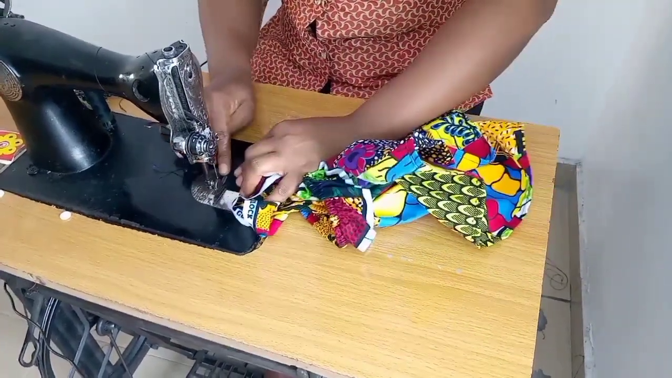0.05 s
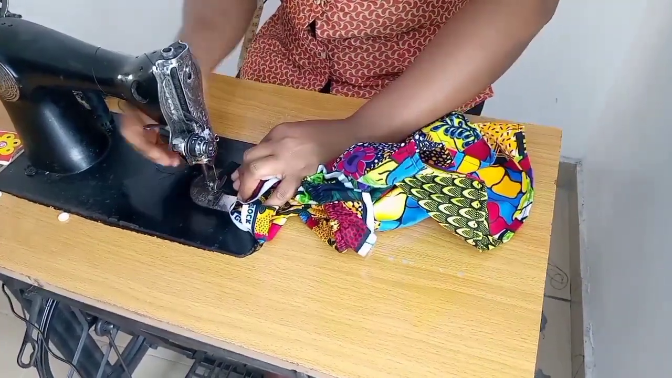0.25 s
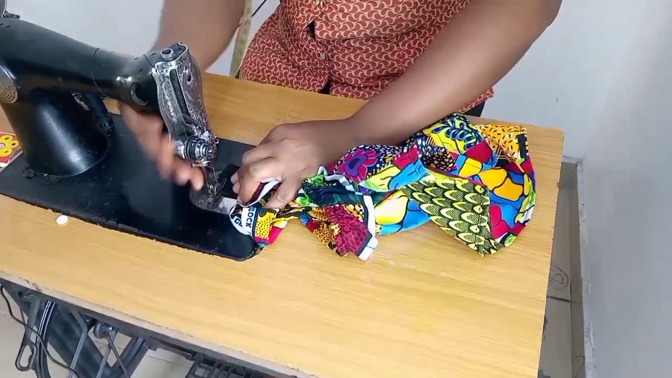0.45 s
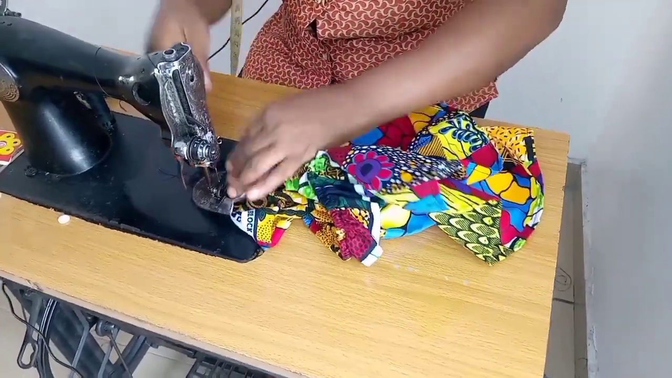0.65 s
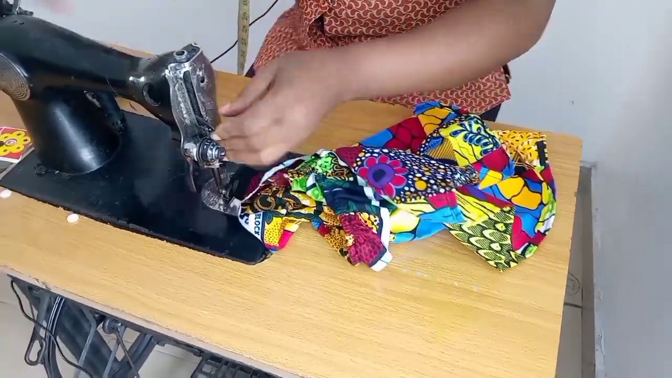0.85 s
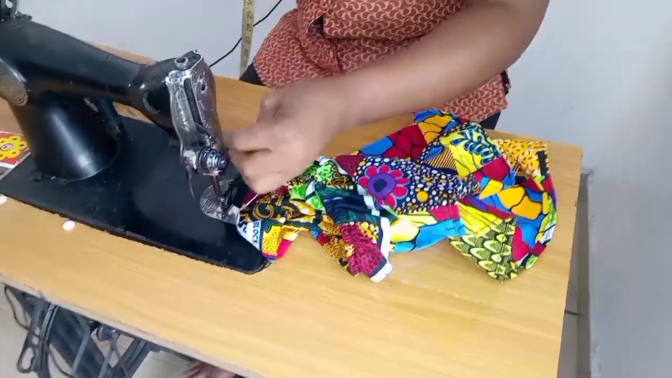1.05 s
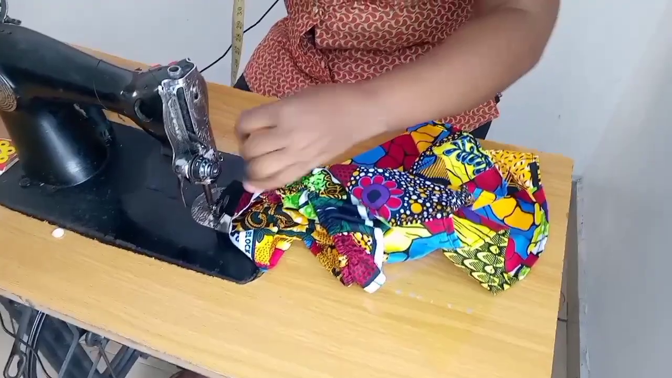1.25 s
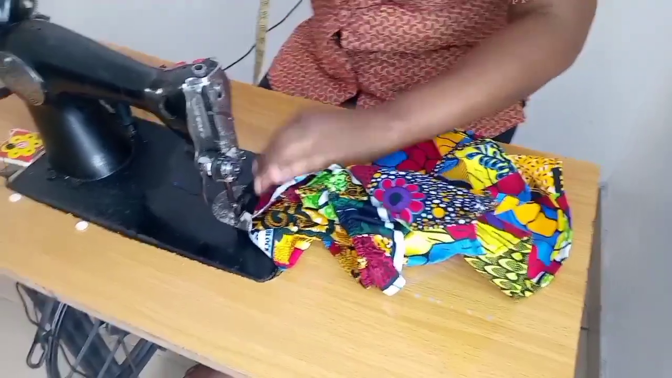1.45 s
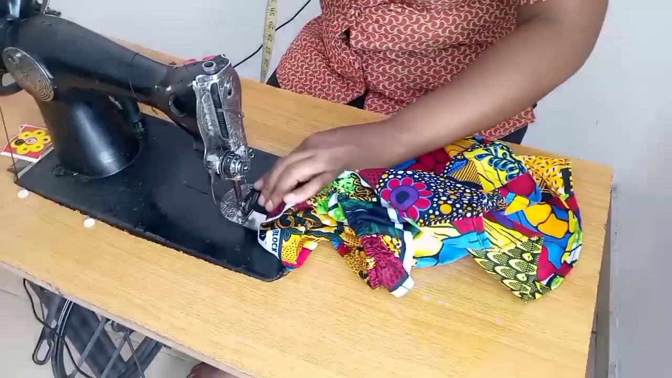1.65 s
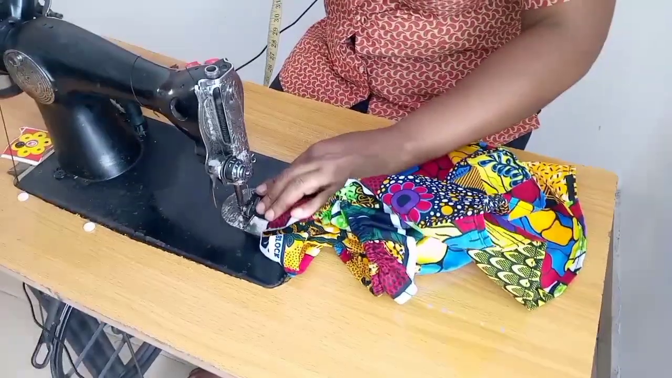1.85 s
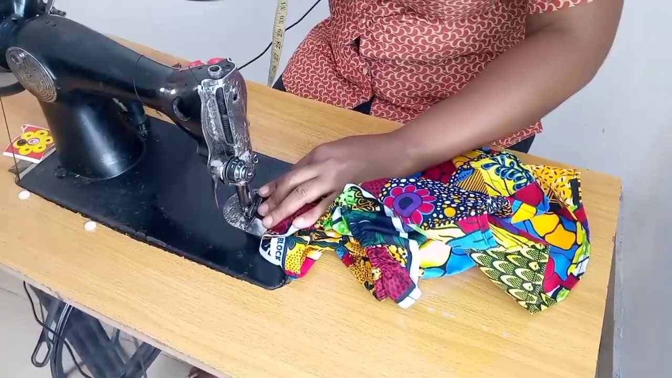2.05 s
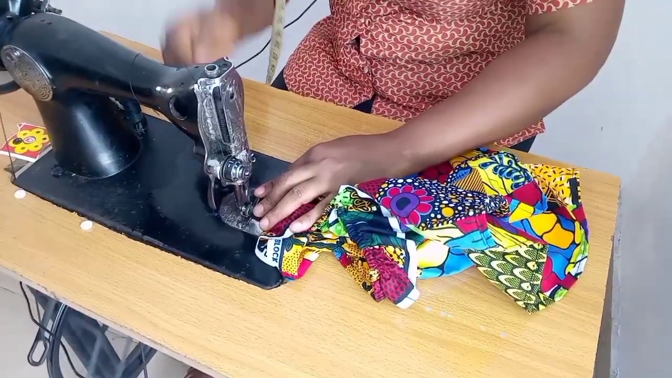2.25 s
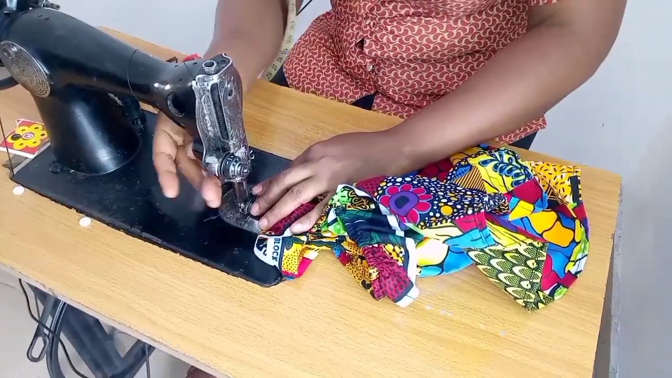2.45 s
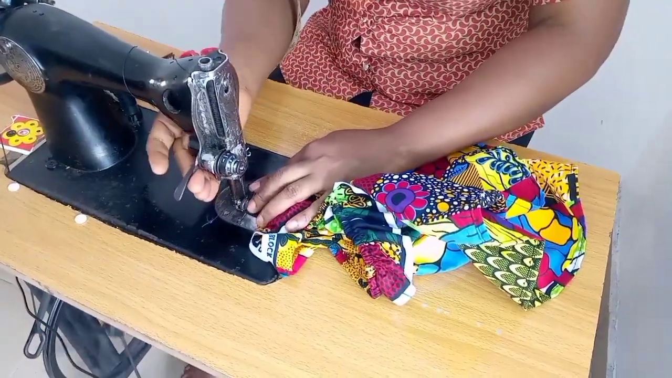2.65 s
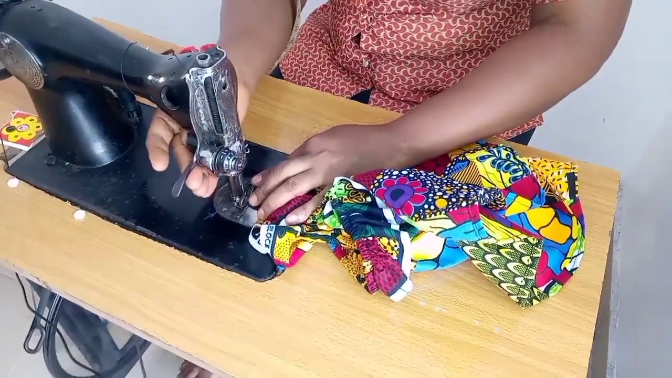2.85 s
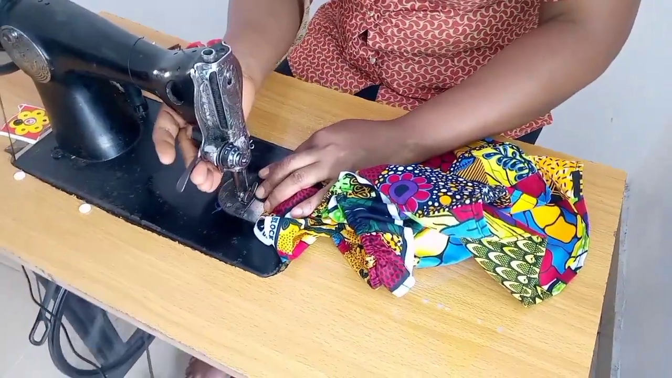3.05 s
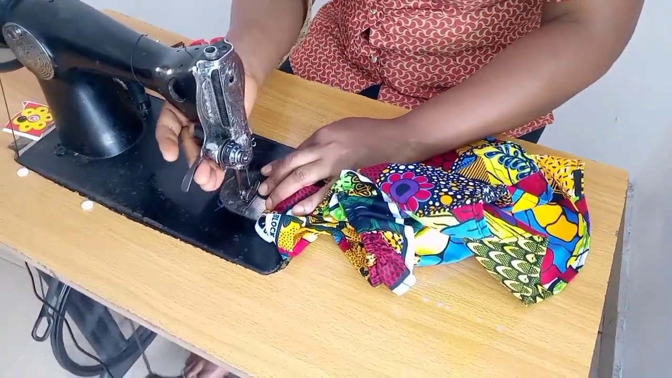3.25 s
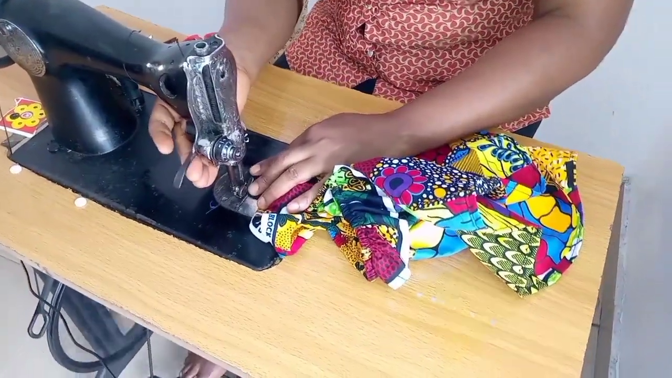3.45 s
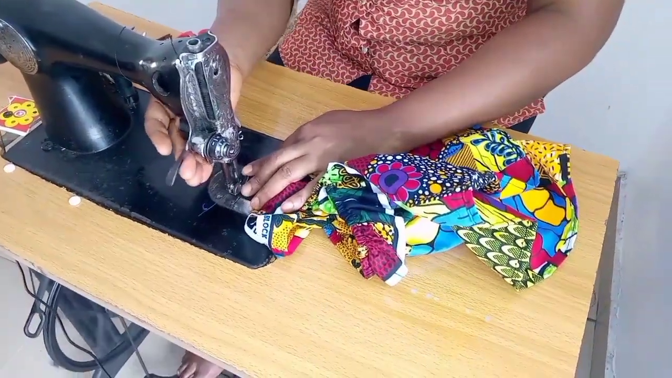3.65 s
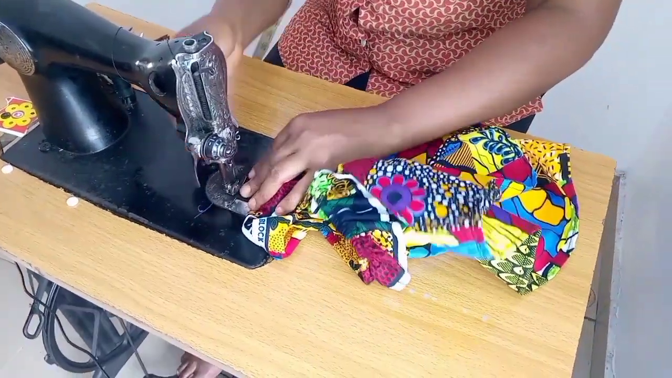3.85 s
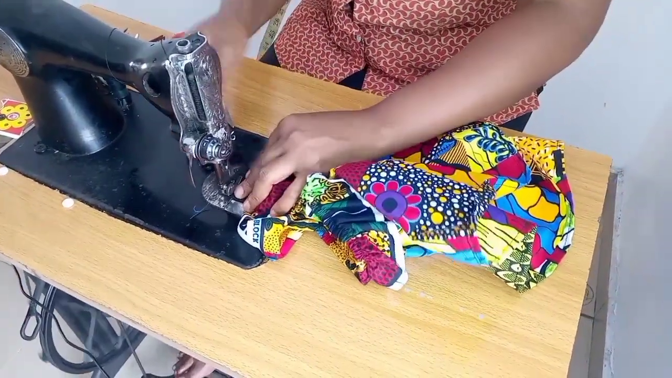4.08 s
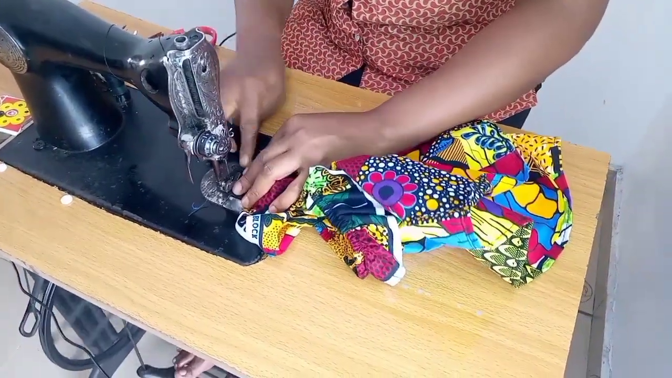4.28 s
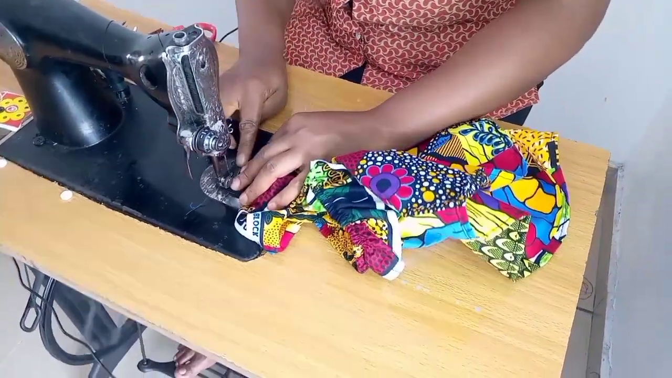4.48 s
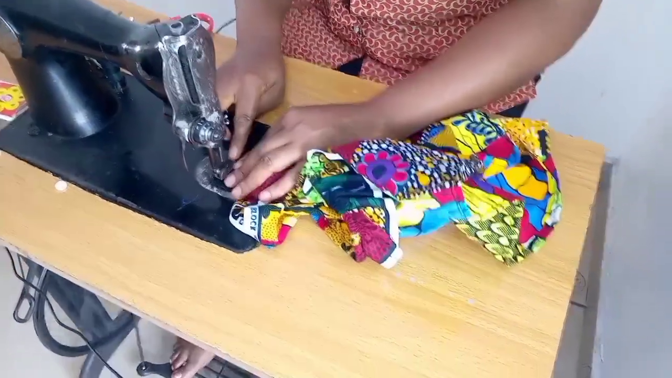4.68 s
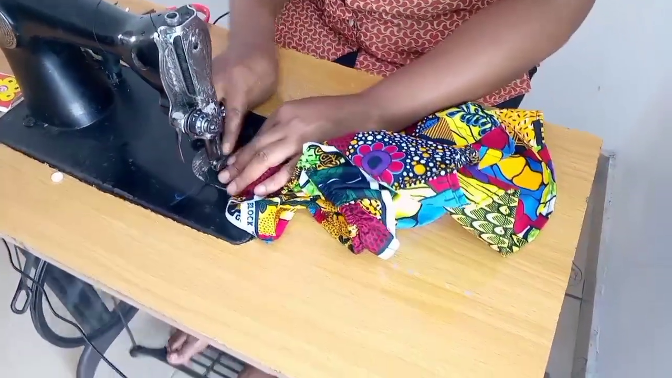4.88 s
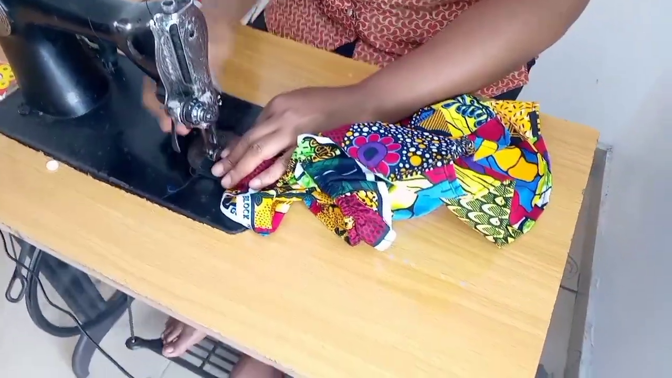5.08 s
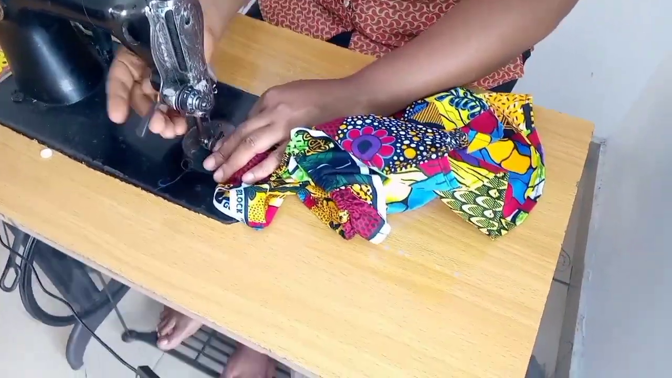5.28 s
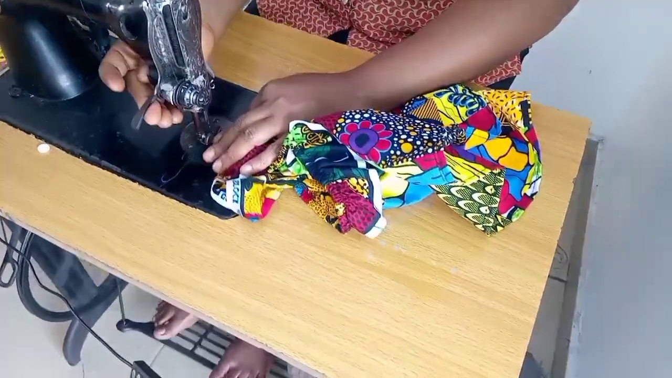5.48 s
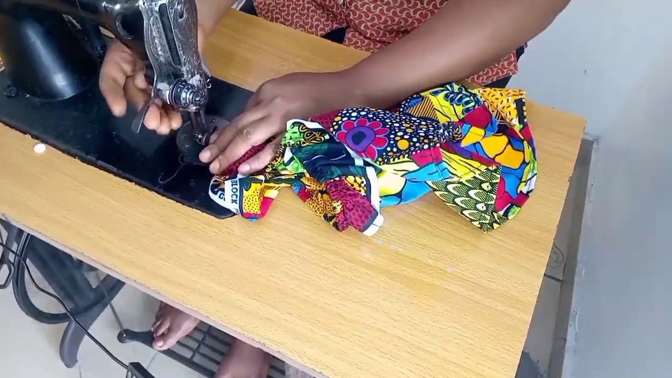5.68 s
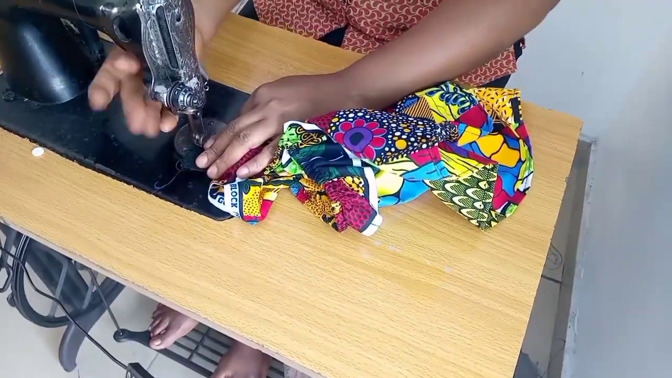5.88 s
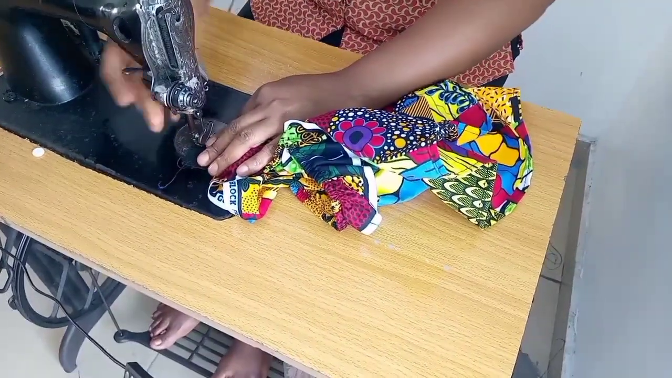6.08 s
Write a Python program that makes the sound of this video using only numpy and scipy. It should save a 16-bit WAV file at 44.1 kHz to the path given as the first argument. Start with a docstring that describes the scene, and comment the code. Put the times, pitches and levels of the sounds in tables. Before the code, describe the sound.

After some faint handling of fabric, a foot-powered sewing machine clatters in two quick bursts with a brief pause between.

```python
"""A treadle sewing machine on a wooden table in a hard, quiet room. Over a far rumble and a low hum,
hands drop the presser foot, rustle the cloth and push the wheel. From 2.5 s comes a short run: each stitch
is one sharp steel click, two lighter ones and three knocks into the iron bed, over a rattle of loose links.
The gear eases off near 4 s, stray clicks and knocks lead into a second run at 4.7 s,
and the machine winds down near 6 s."""
import sys
import numpy as np
from scipy import signal
from scipy.fft import rfft, irfft
from scipy.io import wavfile
from scipy.ndimage import uniform_filter1d

SR = 44100
rng = np.random.default_rng(int(sys.argv[2]) if len(sys.argv) > 2 else 0)


def inscribe(sig):
    """Save sig as 16-bit PCM at rate SR to the path in sys.argv[1].

    A 1-D sig is mono; a 2-D sig holds one channel per row.
    Samples are clipped to [-1, 1] before scaling.
    """
    pcm = np.round(np.clip(np.atleast_2d(sig).T, -1, 1) * 32767)
    wavfile.write(sys.argv[1], SR, pcm.astype(np.int16))


N = 269980

# Levels are relative, ahead of each layer's trim; a blow's chatter is capped at 14 ms.
# fader ride of the far rumble: (time [s], level [dB])
RUMBLE_RIDE = [(0.0, -50), (1.2, -54), (1.55, -54), (1.67, -58.5), (2.05, -56), (2.2, -52), (3.9, -57.5),
               (4.2, -61), (4.5, -54.5), (5.9, -56), (6.12, -60)]
# its tone: (frequency [Hz], density [dB])
RUMBLE_TONE = [(15, -56), (25, -29), (71, -2.5), (103, -7.5), (144, 0), (357, -11), (391, -11), (427, -14),
               (812, -10), (1320, -13), (1410, -10), (2750, -27.5), (5000, -48), (6500, -64), (11000, -120)]
# lowest modes of room, stand, table top and bed plate:
# (pitch [Hz], level against the rumble ride [dB], level at full run [dB])
HUM_MODES = [(75, -10, -66), (118.4, -12.5, -57), (177.4, -8.5, -49.5), (380, -15.5, -54.5)]
# swells of the hum: (peak time [s], pitch [Hz], level [dB], length [s])
HUM_SWELLS = [(.27, 177, -48, 0.11), (0.408, 75.4, -53, .12), (.54, 178, -45, .06), (.54, 120, -47, .06),
              (.59, 76, -54, .1), (0.888, 75.4, -57, 0.14), (2.01, 183, -51, .08),
              (2.223, 386, -43.5, 0.13), (2.293, 119, -47.5, 0.15), (2.56, 183, -45, 0.074),
              (2.66, 390, -43, 0.056), (2.901, 392, -38, 0.046), (3.0, 119, -45, 0.09),
              (3.08, 383, -45, .07), (3.12, 178.4, -40.5, 0.19), (3.19, 388, -36, 0.033),
              (3.37, 377, -34.5, 0.034), (3.288, 385, -49, 0.071), (3.36, 175, -43.5, 0.12),
              (3.441, 121, -44, 0.075), (3.57, 179, -42, 0.11), (3.68, 176, -40, 0.061),
              (3.84, 123, -47, 0.13), (4.073, 400.4, -41, 0.09), (4.497, 388, -32.5, 0.045),
              (4.563, 118.6, -44.5, 0.12), (4.847, 379, -44, 0.092), (4.89, 122, -50, 0.063),
              (5.06, 387, -32, 0.047), (5.11, 387, -36, 0.042), (5.1, 174, -43, .08), (5.2, 175, -42, .1),
              (5.381, 385, -42, 0.084), (5.45, 179.7, -40, 0.16), (5.68, 176, -37, 0.14),
              (5.65, 387, -41.5, 0.16), (5.82, 181, -42, 0.064), (5.916, 385, -37.5, 0.031),
              (0.098, 76, -54, .1), (1.579, 76, -55, 0.093), (1.754, 76, -57, .1), (2.003, 76, -58.5, .12),
              (3.202, 76, -54, 0.099), (5.57, 176, -38, 0.2), (5.522, 388, -41, 0.073),
              (4.741, 393, -47, 0.039), (3.599, 387, -50, .08), (5.98, 175, -43, 0.067),
              (6.0, 119, -46, 0.22)]
# cloth under the hands: (time [s], level [dB])
RUSTLE_RIDE = [(.3, -79), (.79, -75), (.95, -66), (1.07, -69), (1.1, -72), (1.2, -72), (1.24, -68.5),
               (1.66, -97), (1.93, -83.5)]
# its tone: (frequency [Hz], density [dB])
RUSTLE_TONE = [(1760, -16), (3000, 9), (3870, 6), (4720, 4), (5230, 0), (5680, 1.5), (10300, -5),
               (12000, -21), (15500, -9)]
# a hand sweeps over the cloth: (time [s], level [dB])
SWEEP_RIDE = [(0.8, -90), (0.838, -56), (0.86, -53), (0.904, -60), (0.96, -78)]
# its brighter tone: (frequency [Hz], density [dB])
SWEEP_TONE = [(1760, -36), (3000, -4.5), (5680, -14), (7080, -6.5), (7960, -10), (9260, -2.5), (13100, -30),
              (15500, -12)]
# short tugs at the cloth: (onset [s], level [dB])
TUGS = [(1.358, -73), (1.468, -63.5), (1.576, -70.5)]
# one-off steel clicks of hands, wheel and slack parts:
# (peak time [s], level [dB], feed bar offset [dB], needle bar offset [dB], chatter [ms])
STRAY_CLICKS = [(0.3905, -51.5, 2.5, -18, 1.7), (0.455, -60, 3, -22, 2.3), (.5051, -53, -6, -18, 4.7),
                (.5169, -35.5, -2, 1, 2.9), (0.5463, -41.5, -8, -4, 3.7), (.633, -56, -2, -21, 1.3),
                (1.358, -61.5, 4, -27, 4.5), (1.9571, -51.5, -7, -15, 13.5), (1.9946, -53, -1, -10, 3.9),
                (2.0443, -52.5, 4.5, -20, 11), (2.0608, -52.5, 3.5, -23, 1.9),
                (2.125, -50.5, -18, -21, 1.7), (2.1396, -49.5, -10, -9, 3.9), (2.1697, -52, -1.5, -22, 7.1),
                (2.1908, -49, 3, -8, 21), (2.246, -47, -2, -6, 12), (2.366, -53, 1, -29, 3.1),
                (2.3957, -47.5, -10, -9, 4.5), (2.4241, -55, -15, -1, 2.0), (2.4594, -51, 10, -16, 8.9),
                (2.7993, -41, 6, -4, 4.1), (3.3258, -38, -8, -1, 3.1), (3.71, -36.5, -4, -3, 5),
                (3.9098, -57.5, 7.5, -32, 6.4), (4.0427, -49, -3, -21, 14), (4.0521, -47.5, .5, -13, 16),
                (4.2414, -67, 10, -32, 2), (4.2835, -45, -12, 7, 4.9), (4.3123, -48.5, -8, -8, 2.1),
                (4.347, -51, 5.5, -9, 5.9), (4.3753, -41, -6, 1, 3.1), (4.4116, -43.5, -3.5, -17, 4),
                (4.478, -46, -13, -1, 3.2), (4.493, -44.5, 4.5, -6, 16), (4.5756, -53, -8, -14, 3.5),
                (4.6255, -44, -22, 0, 1.1), (4.645, -47, -19, -40, 1.2), (4.6582, -40, -13, 0, 4.4),
                (5.8352, -34.5, -17, -9, 3.8), (5.924, -49, 3, -6, 4.4), (5.959, -39.5, 3, -10, 5)]
# one-off blows into bed and table:
# (peak time [s], level [dB], table thud offset [dB], favoured pitch [Hz], chatter [ms])
STRAY_KNOCKS = [(.519, -48.5, -8, 1310, 16), (1.313, -49.5, -2.5, 1000, 7.1), (1.589, -51, -4.5, 820, 12.6),
                (2.047, -55.5, -7, 1640, 4.4), (2.207, -38, -4, 1380, 21), (2.465, -39, -13, 1310, 4.3),
                (2.639, -34, -17, 775, 9), (3.005, -40.5, -14, 909.5, 7.4), (4.047, -36.5, -8, 1150, 17),
                (4.107, -46.5, -0.5, 1150, 8.7), (4.356, -47, -29, 1300, 11), (4.38, -49, -22, 1250, 4.3),
                (4.496, -35.5, -3, 745, 6.1), (4.549, -46.5, 0.5, 1000, 16), (4.705, -38, -10, 1260, 4),
                (4.845, -38, -3.5, 1120, 16), (5.158, -41, -24, 1150, 5.5), (5.961, -41, -11.5, 860, 5.8)]
# the presser foot lands: (peak time [s], level [dB], chatter [ms])
FOOT_THUMP = (.524, -35.5, 7)
# how each part rings: (pitch [Hz], bandwidth [Hz], level [dB])
SHUTTLE_MODES = [(5230, 360, -2), (5660, 500, -2), (6660, 670, 0), (7720, 800, -2.5), (8670, 1000, -2),
                 (9687, 580, -2.5), (10700, 1000, -7.5), (14250, 2400, -20.5)]
FEED_BAR_MODES = [(2518, 535, -0.5), (3104, 470, -0.5), (3650, 580, -0.5), (4720, 690, -2.5)]
NEEDLE_BAR_MODES = [(14400, 170, 0), (15200, 1300, -2)]
BED_MODES = [(538.6, 84, -6.5), (656.4, 71, -6), (810, 88, -3), (920.6, 100, -3), (1131.7, 120, -1),
             (1269, 130, 1), (1357.6, 120, -0.5), (1577.5, 180, -8.5), (1869, 200, -11)]
TABLE_MODES = [(145.4, 16, -6), (221.7, 26, -5), (310.4, 50, -8), (348.6, 27, -1), (390, 34.5, 0),
               (459.8, 73, -5.5)]
TABLE_TOP_MODES = [(140, 14, -6.5), (194, 40, 2), (251, 22, -1.5)]
# how hard the gear runs: (time [s], drive [dB])
GEAR_DRIVE = [(1.94, -70), (1.99, -77), (2.13, -63), (2.52, -53), (2.66, -45), (2.98, -44), (3.27, -41),
              (3.5, -43), (3.57, -36.5), (3.65, -44), (3.81, -54.5), (4.08, -84), (4.34, -55), (4.45, -56),
              (4.65, -43), (4.87, -43), (5.16, -41.5), (5.51, -40), (5.68, -39), (5.85, -49), (5.98, -52.5),
              (6.12, -74)]
# rattle of shuttle, feed bar, needle bar, bed and table:
# (level at full run [dB], loss as the gear eases [dB per dB])
PART_RATTLES = [(-41, 1.05), (-41, 1.15), (-43, 3), (-39, 1.16), (-52.5, 0.75)]
# rattle within a turn: hushed at the click, swelling by mid-turn, staying up until the next:
# (place [turns], level [dB])
TURN_PULSE = [(0, -5), (.2, -1.5), (.4, 1.5), (.65, 2), (.92, 0), (1, 1.5)]
# one list a run: (shuttle click time [s], level [dB], favoured pitch [Hz], chatter [ms],
# two lighter click levels [dB], three knock levels [dB])
STITCH_RUNS = [
    [(2.4841, -28, 8200, 3.5, -37, -35.5, -42, -40, -40), (2.5983, -28, 8310, 6, -37, -43, -44, -45, -42),
     (2.7068, -26.5, 8580, 4.5, -48, -39, -40, -46, -44),
     (2.8148, -28.5, 7460, 3.4, -52, -39.5, -39, -39.5, -39),
     (2.926, -26.5, 7100, 4.6, -54, -41, -48, -55, -59),
     (3.0292, -35, 6900, 1.9, -32.5, -32, -40.5, -34.5, -38),
     (3.1228, -25, 7260, 4.8, -43, -30, -49, -34.5, -37), (3.2128, -26, 7000, 5.8, -46, -34, -41, -34, -38),
     (3.3071, -26, 6900, 4.7, -45, -32, -38.5, -32.5, -32),
     (3.3944, -25.5, 6900, 3.6, -53, -32.5, -53, -35.5, -37),
     (3.4887, -26.5, 6800, 2.6, -38, -29.5, -40.5, -36.5, -45),
     (3.5687, -28, 6790, 2.9, -43, -35, -45, -39.5, -35.5),
     (3.6515, -22.5, 6560, 2.1, -44, -42, -41, -47, -42.5), (3.733, -55, 6450, 3, -58, -52, -50, -52, -45),
     (3.8132, -36.5, 6030, 1.5, -58, -60, -45.5, -64, -62)],
    [(4.7192, -29, 6530, 1.5, -34.5, -35.5, -48, -37.5, -39),
     (4.816, -25, 9200, 2, -37.5, -46, -37.5, -47, -38),
     (4.9107, -27.5, 9070, 3.7, -37.5, -39, -53, -45, -43),
     (5.0048, -25, 7000, 2.3, -40, -43, -38.5, -36.5, -46),
     (5.1008, -23.5, 6960, 2.8, -48, -37, -37.5, -41.5, -61),
     (5.1819, -26, 8900, 1.3, -34, -33.5, -39.5, -33, -45),
     (5.2711, -24.5, 5780, 2.1, -37, -31, -35, -34.5, -41),
     (5.3584, -25, 8800, 5.7, -39, -43, -39, -38.5, -46),
     (5.4399, -28.5, 6600, 4.2, -35, -35, -41, -34, -50),
     (5.5278, -27, 6680, 3.4, -45, -33, -50, -38, -37.5),
     (5.6037, -23.5, 6560, 3.1, -38, -34.5, -42, -34, -40),
     (5.6932, -24, 6820, 3.7, -42, -49, -38.5, -35.5, -41),
     (5.7726, -30.5, 9100, 2.9, -35, -46, -43, -44, -42), (5.862, -52, 6500, 3.3, -52, -54, -46, -47, -49)],
]
# where each run's rattle pulse stops and its last turn is timed to: (first run [s], second run [s])
# The first comes mid-run, so that last turn's lighter clicks and knocks land ahead of its shuttle click.
RUN_MARKS = [3.3, 5.959]
# lighter clicks of a turn:
# (place [turns], feed bar offset [dB], needle bar offset [dB], favoured pitch [Hz], chatter [ms])
LIGHT_CLICKS = [(.34, -5.5, -2.5, 6950, 4), (.53, -11, -6, 6480, 5.5)]
# knocks of a turn: (place [turns], table thud offset [dB], favoured pitch [Hz], chatter [ms])
STITCH_KNOCKS = [(.055, -8.5, 1190, 7), (.6, -9.5, 1101, 8), (.87, -14.5, 1270, 6.5)]
# the room's tail: (frequency [Hz], time to fall 60 dB [s])
ROOM_DECAY = [(150, 0.67), (500, 0.39), (1400, 0.36), (3700, 0.79), (9700, 0.39), (15000, 0.29)]

FULL_RUN_DB, TUG_FADE_DB_PER_S, STRAY_CLICK_HZ = -40, 145, 6450
STITCH_FEED_DB, STITCH_NEEDLE_DB = -11.5, -4  # the two bars against the shuttle click
PLACE_SPREAD, COLOUR_SPREAD_DB, PITCH_SPREAD = .015, 2.5, .08  # variation from turn to turn
SHELF_HZ, SHELF_DB, TOP_HZ = 15520, -31, 16785


def gain_of(db):
    return 10 ** (np.asarray(db) / 20)


def unit_rms(x):
    return x / np.sqrt(np.mean(x ** 2) + 1e-20)


def at_pitch(points, hz):
    f, value = np.transpose(points)
    return np.interp(np.log(hz + 1), np.log(f + 1), value)


def ride(points, before_db=None, after_db=None):
    """A fader move as gain; the end levels hold unless others are given."""
    return gain_of(np.interp(np.arange(N) / SR, *np.transpose(points), before_db, after_db))


def add(mix, s, sound):
    part = mix[round(s * SR):][:len(sound)]
    part += sound[:len(part)]


def hiss(tone, patchy_db, patch_size):
    """Coloured noise with drifting patches; patch_size is (bins, frames)."""
    frames, hz = N // 256 + 5, np.fft.rfftfreq(1024, 1 / SR)
    real, imag, patches = rng.standard_normal((frames, 513, 3)).T
    patches = uniform_filter1d(patches, patch_size[0], axis=0)
    patches = unit_rms(uniform_filter1d(patches, patch_size[1], axis=1))
    spectra = (real + 1j * imag) * gain_of(at_pitch(tone, hz)[:, None] + patchy_db * patches)
    return unit_rms(signal.istft(spectra, nperseg=1024, noverlap=768)[1][:N])


def tap_ring(modes):
    """A part's ring after one tap, at unit energy: wider modes die sooner."""
    t = np.arange(4096) / SR
    rung = sum((-1) ** k * gain_of(db) * width * np.exp(-np.pi * width * t) * np.sin(2 * np.pi * hz * t)
               for k, (hz, width, db) in enumerate(modes))
    return rung / np.linalg.norm(rung)


def ring(force, modes):
    """A running force shakes the part."""
    return signal.oaconvolve(force, tap_ring(modes))[:N]


def blows(times, levels_db, chatter_ms, modes, rise_ms, fall, spots_hz=None, focus_db=0):
    """Each blow is a brief chatter of contacts; the spot it hits favours the modes near one pitch."""
    out, hz, ms = np.zeros(N), np.fft.rfftfreq(8192, 1 / SR) + 1, np.arange(2048) / SR * 1000
    attack = np.sin(np.pi / 2 * np.minimum(ms / rise_ms, 1)) ** 2
    decay = np.exp(-(np.maximum(ms - rise_ms, 0) / np.clip(chatter_ms, .3, 14)[:, None]) ** fall)
    contacts = rng.standard_normal(decay.shape) * attack * decay
    spectra = rfft(contacts, 8192) * rfft(tap_ring(modes), 8192)
    if focus_db:
        spectra *= gain_of(focus_db * np.exp(-(np.log2(hz / spots_hz[:, None]) / 0.22) ** 2))
    rung = irfft(spectra)[:, :6000]
    powers = uniform_filter1d(rung ** 2, size=round(rise_ms * SR / 1000), axis=1)
    for s, db, sound, power in zip(times, levels_db, rung, powers):
        add(out, s - power.argmax() / SR, gain_of(db) * sound / np.sqrt(power.max()))  # peak lands on s
    return out


def far_rumble():
    """A dark, distant wash that fills the pauses."""
    return gain_of(0.5) * ride(RUMBLE_RIDE) * hiss(RUMBLE_TONE, patchy_db=0.5, patch_size=(8, 16))


def low_hum():
    """Low modes waver and throb, louder while the gear runs; now and then one swells."""
    out, drive = np.zeros(N), gain_of(gear_db())
    for hz, rest_db, run_db in HUM_MODES:
        drift = uniform_filter1d(rng.standard_normal((2, N)), size=2000)
        waver, throb = unit_rms(uniform_filter1d(drift, size=2000))
        level = np.hypot(gain_of(rest_db) * ride(RUMBLE_RIDE), gain_of(run_db) * np.sqrt(drive))
        phase = 2 * np.pi * np.cumsum(hz * (1 + 0.0199 * waver)) / SR
        out += level * gain_of(3.64 * throb) * np.sin(phase)
    for (s, hz, db, length), chance in zip(HUM_SWELLS, rng.random((len(HUM_SWELLS), 3))):
        t = np.arange(-.6 * length, 1.5 * length, 1 / SR)
        swell = np.exp(-(t / (length * np.where(t < 0, .25, .55))) ** 2)
        wobble = 0.35 * np.sin(2 * np.pi * (0.069 * hz * (1 + chance[1]) * t + chance[2]))
        add(out, s + t[0], gain_of(db) * swell * np.sin(2 * np.pi * (hz * t + chance[0]) + wobble))
    return gain_of(-4.5) * np.sqrt(2) * out


def cloth():
    """Fibres slide under the hands: a soft rustle, one brighter sweep, three short tugs."""
    t = np.arange(N) / SR
    tugs = sum(gain_of(db - TUG_FADE_DB_PER_S * abs(t - s)) * np.clip((t - s) / 0.0031, 0, 1)
               for s, db in TUGS)
    handling = ride(RUSTLE_RIDE, after_db=-120) + tugs
    rustle = handling * hiss(RUSTLE_TONE, patchy_db=3.5, patch_size=(8, 20))
    sweep = ride(SWEEP_RIDE, -120, -120) * hiss(SWEEP_TONE, patchy_db=3, patch_size=(8, 12))
    return rustle + sweep


def steel_parts(clicks):
    """The bright layer: clicks and rattle ring the shuttle, the feed bar and the needle bar."""
    s, db, feed_db, needle_db, spot_hz, ms = clicks.T
    loose = gain_of(-4.5) * turn_pulse() * rattle(per_s=200, spread_db=2.5, tap_ms=8.5, scrape=0.27)
    shuttle, feed, needle = (level * loose for level in rattle_gains()[:3])
    return (ring(shuttle, SHUTTLE_MODES)
            + blows(s, db, ms, SHUTTLE_MODES, rise_ms=2.6, fall=0.95, spots_hz=spot_hz, focus_db=2.5)
            + ring(feed, FEED_BAR_MODES)
            + blows(s, db + feed_db, ms, FEED_BAR_MODES, rise_ms=2.8, fall=0.71)
            + ring(needle, NEEDLE_BAR_MODES)
            + blows(s, db + needle_db, ms, NEEDLE_BAR_MODES, rise_ms=3.2, fall=1.1))


def bed_and_table(knocks):
    """The body: knocks, foot drop and shaking gear ring iron and wood; soft contacts dull the treble."""
    s, db, thud_db, spot_hz, ms = knocks.T
    bed_gain, table_gain = rattle_gains()[3:]
    bed_shake = bed_gain * turn_pulse() * rattle(per_s=55, spread_db=3.5, tap_ms=4.3, scrape=1)
    bed = ring(gain_of(-8.5) * bed_shake, BED_MODES)
    bed += blows(s, db, ms, BED_MODES, rise_ms=7, fall=1.7, spots_hz=spot_hz, focus_db=4.5)
    table_shake = table_gain * rattle(per_s=30, spread_db=6, tap_ms=7.2, scrape=0.99)
    table = ring(gain_of(-4) * table_shake, TABLE_MODES)
    table += blows(s, db + thud_db, ms, TABLE_MODES, rise_ms=8, fall=1.4)
    soft = signal.butter(2, 2600, fs=SR, output="sos")
    return signal.sosfilt(soft, bed + table + presser_foot())


def presser_foot():
    """The foot drops and thumps the table top."""
    return blows(*np.transpose([FOOT_THUMP]), TABLE_TOP_MODES, rise_ms=2.7, fall=0.71)


def gear_db():
    """The gear's drive against a full run."""
    return np.interp(np.arange(N) / SR, *np.transpose(GEAR_DRIVE), left=-120) - FULL_RUN_DB


def rattle(per_s, spread_db, tap_ms, scrape):
    """Loose links: small random taps of uneven size over a steady scrape."""
    sizes = gain_of(spread_db * np.minimum(rng.exponential(1, N), 4))
    hits = rng.random(N) < per_s / SR
    tap = np.exp(-np.arange(1500) / SR * 1000 / tap_ms)
    taps = unit_rms(signal.oaconvolve(sizes * hits, tap)[:N])
    return unit_rms(taps + scrape) * rng.standard_normal(N)


def rattle_gains():
    """All five parts shake harder as the gear picks up."""
    return [gain_of(full_db + loss * gear_db()) for full_db, loss in PART_RATTLES]


def turn_pulse():
    """The rattle pulses with each turn, from a run's first stitch to its mark; flat elsewhere."""
    t, db = np.arange(N) / SR, np.zeros(N)
    for run, end in zip(STITCH_RUNS, RUN_MARKS):
        marks = np.append(np.transpose(run)[0], end)
        place = np.interp(t, marks, np.arange(len(marks))) % 1
        db += np.interp(place, *np.transpose(TURN_PULSE)) * (t > marks[0]) * (t < end)
    return gain_of(db)


def cue_lists():
    """Every click and knock: the stray ones, then three of each for every stitch."""
    stitches = np.vstack(STITCH_RUNS)
    s, db, hz, chatter_ms, *levels_db = stitches.T
    turn_s = np.concatenate([np.diff(np.transpose(run)[0], append=end)
                             for run, end in zip(STITCH_RUNS, RUN_MARKS)])
    chance = rng.standard_normal((len(s), 5, 3)).transpose(1, 2, 0)
    feed_vary, needle_vary = COLOUR_SPREAD_DB * rng.standard_normal((len(s), 2)).T

    def each_turn(pattern, levels, draws):
        for (place, colour_db, *fixed_db, spot_hz, ms), level, draw in zip(pattern, levels, draws):
            times = s + turn_s * (place + PLACE_SPREAD * draw[0])
            colour = colour_db + COLOUR_SPREAD_DB * draw[1]
            pitch = spot_hz * (1 + PITCH_SPREAD * draw[2])
            yield np.column_stack(np.broadcast_arrays(times, level, colour, *fixed_db, pitch, ms))

    clicks = [np.insert(STRAY_CLICKS, 4, STRAY_CLICK_HZ, axis=1),
              np.c_[s, db, STITCH_FEED_DB + feed_vary, STITCH_NEEDLE_DB + needle_vary, hz, chatter_ms],
              *each_turn(LIGHT_CLICKS, levels_db[:2], chance[:2])]
    knocks = [STRAY_KNOCKS, *each_turn(STITCH_KNOCKS, levels_db[2:], chance[2:])]
    return np.vstack(clicks), np.vstack(knocks)


def room(x, count=3):
    """Each band dies at its own speed; three echo tails crossfade for a smooth ring with no set pitch."""
    taps = np.zeros((count, SR))
    at = np.arange(300, SR - 20, 20) + rng.integers(0, 20, (count, (SR - 301) // 20))
    np.put_along_axis(taps, at, rng.choice([-1., 1.], at.shape), axis=1)
    hz, t, spectra = signal.stft(taps, SR, nperseg=256)
    decay = gain_of(-60 * t / at_pitch(ROOM_DECAY, hz)[:, None])
    tails = signal.istft(spectra * decay, SR, nperseg=256)[1]
    crossfade = np.pi * (7.3 * np.arange(N) / SR + np.arange(count)[:, None] / count)
    sends = np.sqrt(2 / count) * np.cos(crossfade) * x
    return signal.fftconvolve(sends, tails / np.linalg.norm(tails[0]), axes=1)[:, :N].sum(0)


def scene():
    """The mono mix: the machine and its room echo, with rumble, hum and dry cloth."""
    clicks, knocks = cue_lists()
    bright, body = steel_parts(clicks), bed_and_table(knocks)
    echo = room(gain_of(-6.5) * bright + gain_of(-1) * body)
    return (bright + body + echo + far_rumble() + low_hum() + cloth())[None]


def record(dry):
    """The microphone loses the deepest bass; a steep shelf and a high cut take off the very top."""
    dry = signal.sosfilt(signal.butter(2, 55, "high", fs=SR, output="sos"), dry)
    shelf_split = signal.firwin(511, SHELF_HZ, window=("kaiser", 7), fs=SR)
    high_cut = signal.firwin(511, TOP_HZ, window=("kaiser", 9), fs=SR)
    below = signal.oaconvolve(dry, shelf_split[None], "same")
    shelved = below + gain_of(SHELF_DB) * (dry - below)
    return signal.oaconvolve(shelved, high_cut[None], "same")


dry = scene()
out = record(dry)
inscribe(out)
```